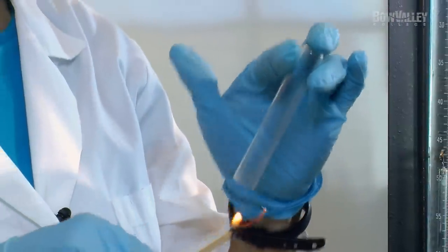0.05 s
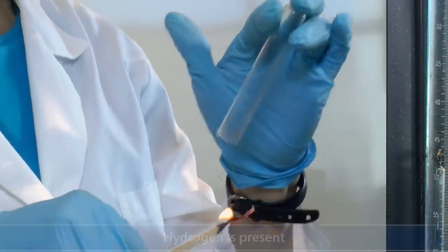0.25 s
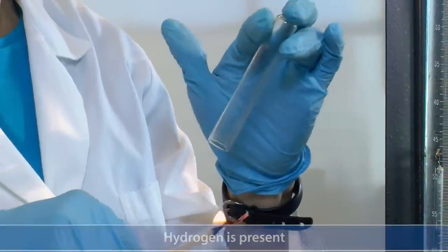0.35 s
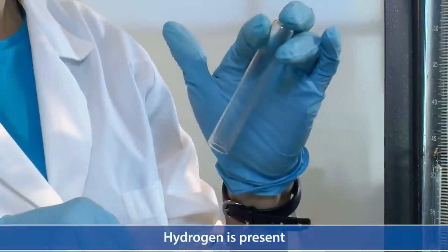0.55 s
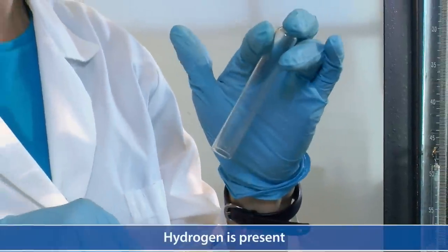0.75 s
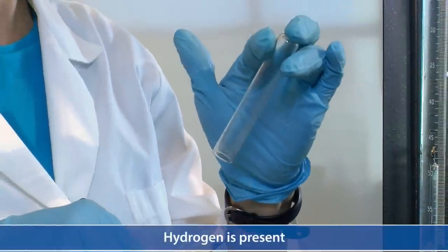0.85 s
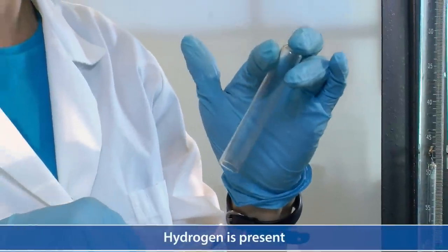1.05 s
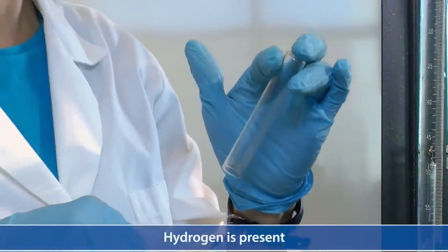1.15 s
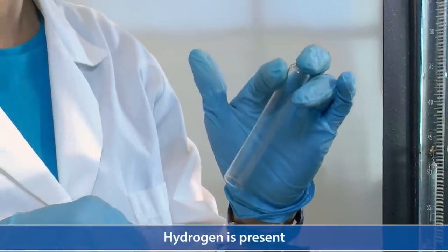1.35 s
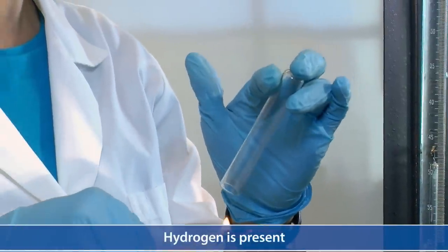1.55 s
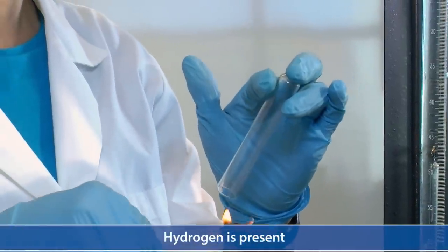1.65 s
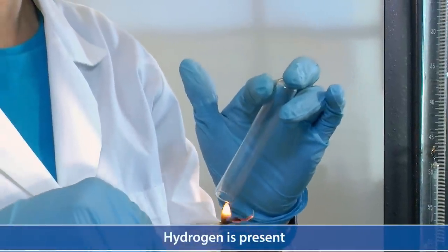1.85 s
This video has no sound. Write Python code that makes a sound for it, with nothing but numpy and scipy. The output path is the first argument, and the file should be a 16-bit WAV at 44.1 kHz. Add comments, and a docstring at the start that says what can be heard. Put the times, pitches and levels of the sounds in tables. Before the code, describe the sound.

Gas lit in a test tube gives one loud pop with a quick rising squeak, slightly overloading the nearby microphone. A short room echo fades, then only low ventilation and tiny clicks remain in the quiet laboratory.

```python
"""A quiet laboratory: hydrogen in a test tube is lit with a splint, close to a clip-on microphone.
A soft ignition puff, then the flame drives the tube's air column into a 30 ms rising squeak that
overloads the microphone. The flame breaks up in a turbulent burst; the gas blast hits the microphone
with a low thump. The room rings on over ventilation, faint ticks, a small lip click and a low
handling bump."""
import sys
import numpy as np
from scipy import signal
from scipy.fft import irfft
from scipy.io import wavfile

SR = 44100
rng = np.random.default_rng(int(sys.argv[2]) if len(sys.argv) > 2 else 0)


def inscribe(sig):
    """Save sig as 16-bit PCM at rate SR to the path in sys.argv[1].

    A 1-D sig is mono; a 2-D sig holds one channel per row.
    Samples are clipped to [-1, 1] before scaling.
    """
    pcm = np.round(np.clip(np.atleast_2d(sig).T, -1, 1) * 32767)
    wavfile.write(sys.argv[1], SR, pcm.astype(np.int16))


N = 83790

IGNITION_S, PUFF_RISE_S = .205, .003
FIZZ_DB, FIZZ_HZ, FIZZ_DECAY_S = -36, 5000, .002
OCTAVE_DB, JITTER_RMS = -25, .006  # second harmonic at unit amplitude; fraction of pitch
BURST_S, BURST_RISE_S, BURST_DECAY_S, BURST_DB = .2243, .002, .004, -5.5
THUMP_S, THUMP_RISE_S, THUMP_DECAY_S, THUMP_DB = .2235, .003, .014, -5
SETTLE_DECAY_S, SETTLE_DB = .06, -19
ROOM_DB, ROOM_GAP_S, ROOM_T60_S, TREBLE_T60_S = -22, .009, .385, .26
TICK_RISE_S, VENT_DB = .0017, -55
CLIP_LEVEL, COUPLING_HZ, TOP_HZ = .54, .22, 15900

# Air column pitch. Each row: time in seconds, pitch in Hz.
SQUEAK_PITCH = [(.209, 1550), (.212, 1800), (.2145, 2030), (.217, 2128), (.2238, 2118), (.2262, 1601),
                (.2285, 2117), (.25, 2115)]
# Air column amplitude. Each row: time in seconds, peak level in dB.
SQUEAK_LEVEL = [(.207, -38.5), (.2105, -24), (.214, -11), (.2175, 7), (.2238, 8), (.2262, -2), (.231, -4),
                (.242, -7), (.247, -22), (.256, -50.5)]
# Ignition modes. Each row: frequency in Hz, level in dB, T60 in seconds.
PUFF_MODES = [(255, -11, .02), (740, -18, .014), (1080, -18, .012), (1400, -24, .012)]
# Turbulence spectrum. Each row: frequency in Hz, relative level in dB.
BURST_SPECTRUM = [(100, -18), (340, -1), (460, -24), (560, -26), (690, 0), (900, -3), (1300, 1),
                  (1700, -0.5), (2100, -5), (2550, -25), (3200, -23), (5000, -26), (9000, -32),
                  (15000, -46)]
# Room tail spectrum. Each row: frequency in Hz, relative level in dB.
ROOM_SPECTRUM = [(100, -5), (280, 1), (550, -5.5), (850, -10), (1300, 2), (1800, 0.5), (2130, 0),
                 (2600, -1), (3200, -1), (4300, -13), (6500, 1), (10000, -2), (15000, -15)]
# Bench and wall reflections. Each row: delay in seconds, gain in dB.
REFLECTIONS = [(.0405, -31), (.056, -33.5)]
# Faint ticks, a lip click and a handling bump. Each row: start in seconds, level in dB, centre in Hz,
# half-width in octaves, decay in seconds.
FAINT_TICKS = [(.064, -65.5, 5000, .8, 0.0045), (.353, -60, 9000, .35, .003),
               (.359, -52, 6800, 0.79, 0.0029), (.955, -64, 4600, .07, .006), (.983, -55, 1800, .9, 0.0027),
               (0.9887, -52, 1980, 1, 0.0029), (1.542, -58.5, 6000, 0.84, .003),
               (1.545, -55.5, 80.6, .4, 0.03), (1.819, -63, 4500, .6, 0.0027)]
# Air noise and microphone hiss. Each row: frequency in Hz, relative level in dB.
VENT_SPECTRUM = [(30, -34.5), (80, -26), (140, -10), (210, -3.5), (270, -5.5), (330, -9), (430, -13),
                 (520, -12), (600, -16), (720, -14), (950, -23.5), (1400, -27.5), (2200, -33), (5000, -37),
                 (15500, -41.5)]
# Ventilation hum. Each row: centre in Hz, width in Hz, rms level in dB.
HUM_LINES = [(208, 20, -60.5), (257, 8, -60)]


def undb(db):
    """Decibels to gain."""
    return 10 ** (np.asarray(db) / 20)


def curve(t, rows):
    """Straight lines through (seconds, value) rows."""
    return np.interp(t, *np.array(rows).T)


def noise(gain_at):
    """Unit-rms noise shaped by a function of frequency."""
    hz = np.maximum(np.arange(N // 2 + 1) * SR / N, 1)
    x = irfft(np.exp(2j * np.pi * rng.random(len(hz))) * gain_at(hz), N)
    return x / np.std(x)


def colour(points):
    """Gain against frequency through (Hz, dB) points."""
    f, db = np.array(points).T
    return lambda hz: undb(np.interp(np.log(hz), np.log(f), db))


def strike(t, start_s, rise_s, decay_s):
    """Smooth rise, then exponential decay."""
    age_s = t - start_s
    attack = np.sin(np.pi / 2 * np.clip(age_s / rise_s, 0, 1)) ** 2
    return attack * np.exp(-np.maximum(age_s - rise_s, 0) / decay_s)


def squeak(t):
    """Flame-driven air column: pitch climbs as the gas heats; the wave turns lopsided as it grows."""
    jitter = JITTER_RMS * noise(lambda f: 1 / (1 + (f / 300) ** 2))
    hz = curve(t, SQUEAK_PITCH) * (1 + jitter)
    phase = 2 * np.pi * np.cumsum(hz * (t > IGNITION_S)) / SR
    sounding = (t > SQUEAK_LEVEL[0][0]) & (t < SQUEAK_LEVEL[-1][0])
    amplitude = undb(curve(t, SQUEAK_LEVEL)) * sounding
    return amplitude * np.sin(phase) - undb(OCTAVE_DB) * amplitude ** 2 * np.cos(2 * phase)


def flame_burst(t):
    """The flame breaks up into a short turbulent roar."""
    envelope = strike(t, BURST_S, BURST_RISE_S, BURST_DECAY_S)
    return undb(BURST_DB) * noise(colour(BURST_SPECTRUM)) * envelope


def blast_thump(t):
    """The gas blast hits the microphone: a low thump of negative pressure that settles slowly."""
    fast = undb(THUMP_DB) * strike(t, THUMP_S, THUMP_RISE_S, THUMP_DECAY_S)
    slow = undb(SETTLE_DB) * strike(t, THUMP_S, THUMP_RISE_S, SETTLE_DECAY_S)
    return -fast - slow


def ignition_puff(t):
    """Gas catches at the tube mouth: heavily damped modes and a brief fizz."""
    age_s = np.maximum(t - IGNITION_S, 0)
    modes = np.zeros(N)
    for hz, db, t60_s in PUFF_MODES:
        envelope = strike(t, IGNITION_S, PUFF_RISE_S, t60_s / np.log(1000))
        modes += undb(db) * np.sin(2 * np.pi * hz * age_s) * envelope
    fizz = noise(lambda f: 1 / (1 + (f / FIZZ_HZ) ** 4))
    fizz *= strike(t, IGNITION_S, PUFF_RISE_S, FIZZ_DECAY_S)
    return undb(FIZZ_DB) * fizz - modes


def room(t, source):
    """Two near reflections and a diffuse tail whose treble dies sooner."""
    wash = noise(colour(ROOM_SPECTRUM))
    low = signal.sosfiltfilt(signal.butter(2, 3500, fs=SR, output="sos"), wash)
    tail = sum(band * strike(t, ROOM_GAP_S, .004, t60_s / np.log(1000))
               for band, t60_s in [(low, ROOM_T60_S), (wash - low, TREBLE_T60_S)])
    tail *= undb(ROOM_DB) / np.sqrt(np.sum(tail ** 2))
    echoes = sum(undb(db) * np.interp(t - delay_s, t, source) for delay_s, db in REFLECTIONS)
    return signal.fftconvolve(source, tail)[:N] + echoes


def faint_ticks(t):
    """Ticks, a small lip click and a low handling bump: short pulses of band noise."""
    ticks = np.zeros(N)
    for start_s, db, hz, half_width_oct, decay_s in FAINT_TICKS:
        band = noise(lambda f: 1 / (1 + (np.log2(f / hz) / half_width_oct) ** 4))
        ticks += undb(db) * strike(t, start_s, TICK_RISE_S, decay_s) * band
    return ticks


def ventilation():
    """Steady air noise and hiss with two wavering hum lines."""
    hum = sum(undb(db) * noise(lambda f: 1 / (1 + (2 * (f - hz) / width_hz) ** 2))
              for hz, width_hz, db in HUM_LINES)
    return undb(VENT_DB) * noise(colour(VENT_SPECTRUM)) + hum


def scene():
    """Pop, room and background at the microphone, mono."""
    t = np.arange(N) / SR
    pop = ignition_puff(t) + squeak(t) + flame_burst(t)
    return (pop + blast_thump(t) + room(t, pop) + faint_ticks(t) + ventilation())[None]


def record(dry):
    """Input stage: hard clip, AC coupling that drifts slowly back to rest, low-pass."""
    oversampled = signal.resample_poly(dry, 4, 1, axis=1)
    clipped = signal.resample_poly(np.clip(oversampled, -CLIP_LEVEL, CLIP_LEVEL), 1, 4, axis=1)
    coupled = signal.lfilter(*signal.butter(1, COUPLING_HZ, "high", fs=SR), clipped)
    lowpass = signal.firwin(161, TOP_HZ, fs=SR, window=("kaiser", 8))
    return signal.fftconvolve(coupled, lowpass[None], mode="same")


dry = scene()
out = record(dry)
inscribe(out)
```